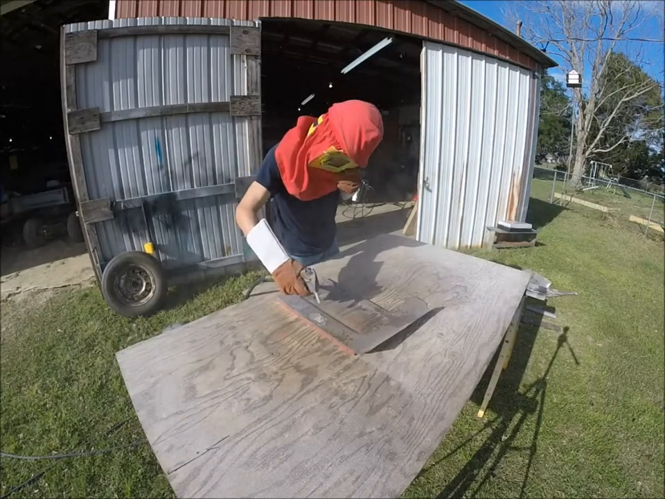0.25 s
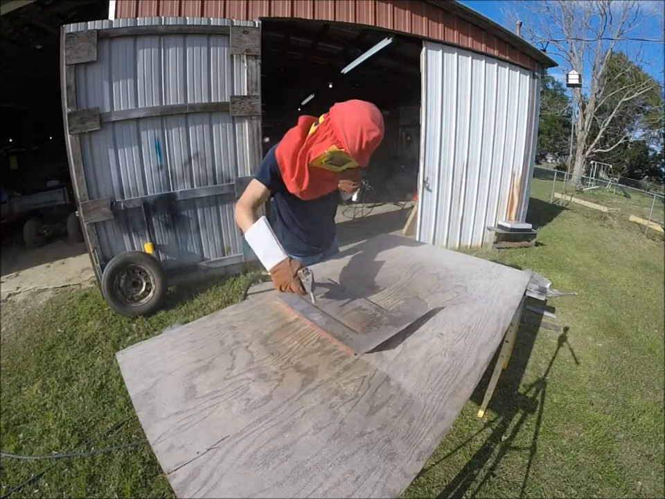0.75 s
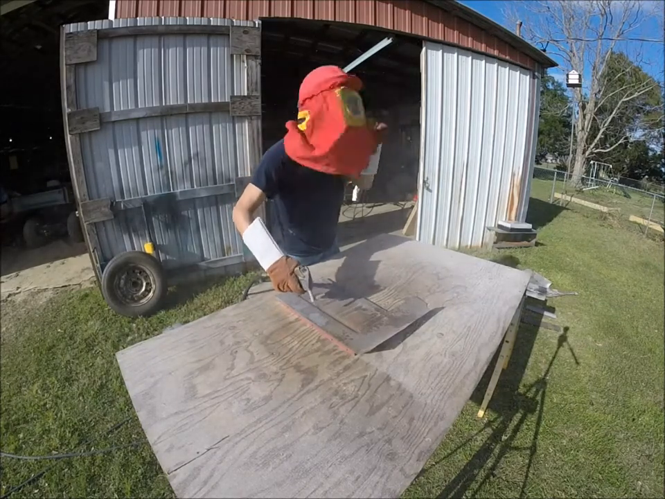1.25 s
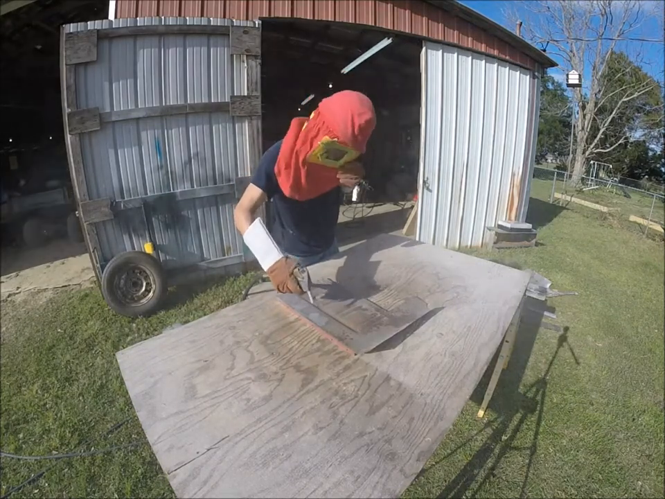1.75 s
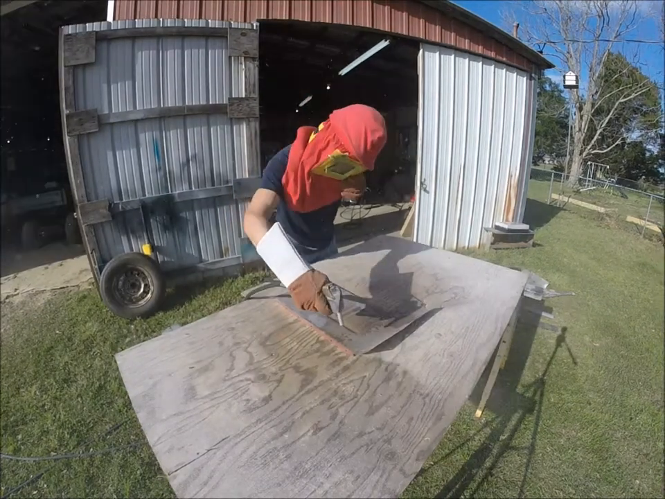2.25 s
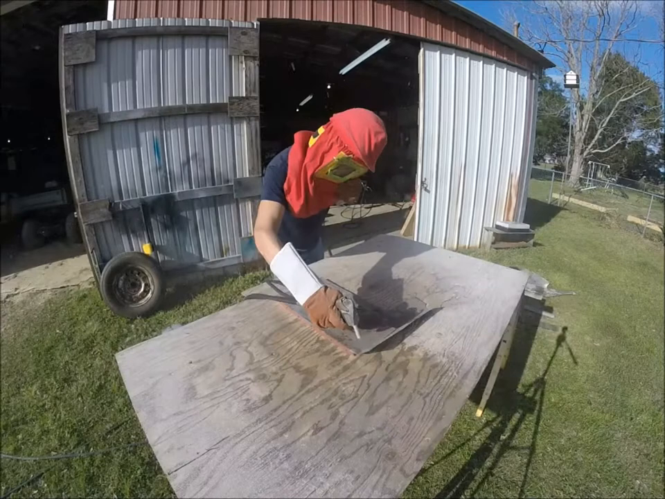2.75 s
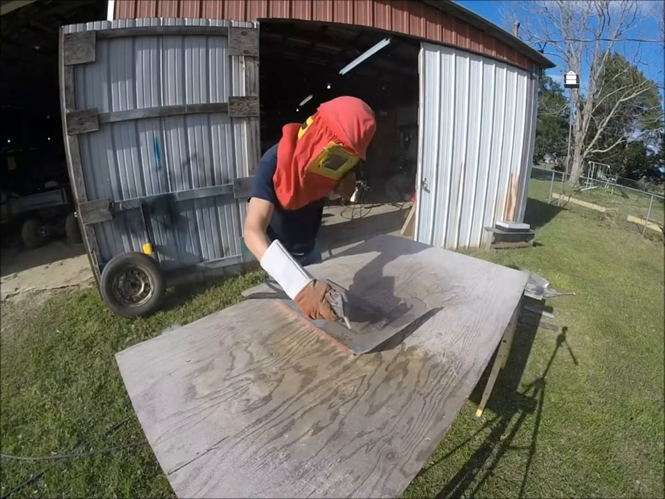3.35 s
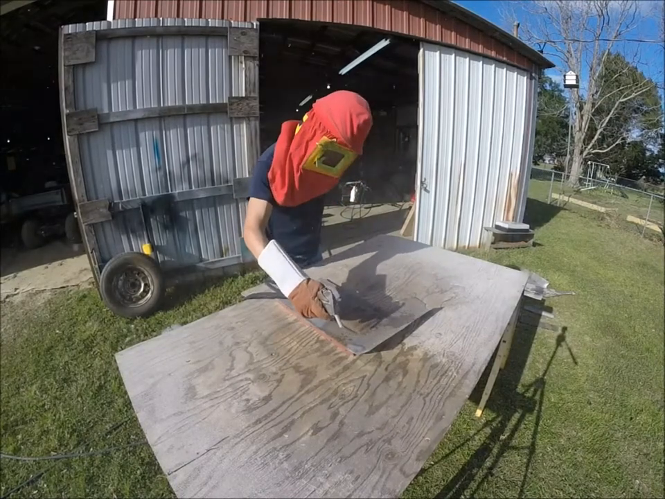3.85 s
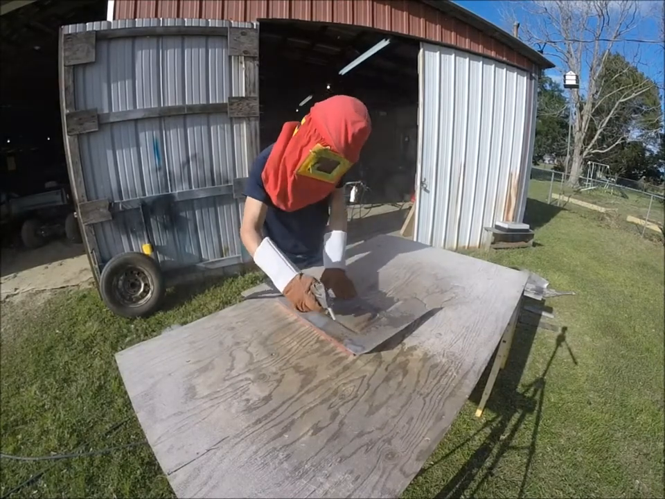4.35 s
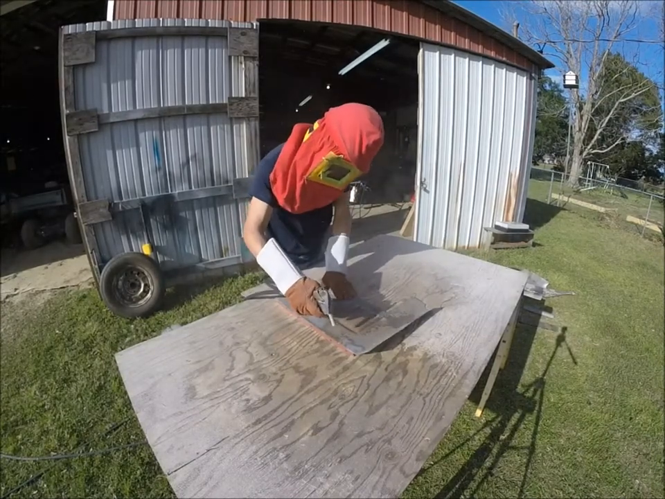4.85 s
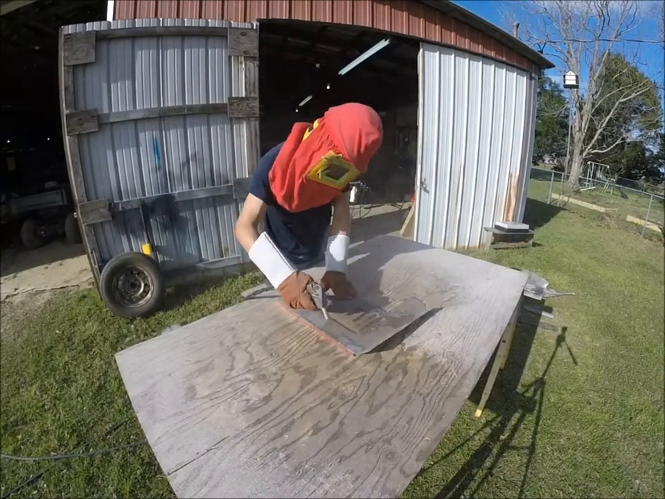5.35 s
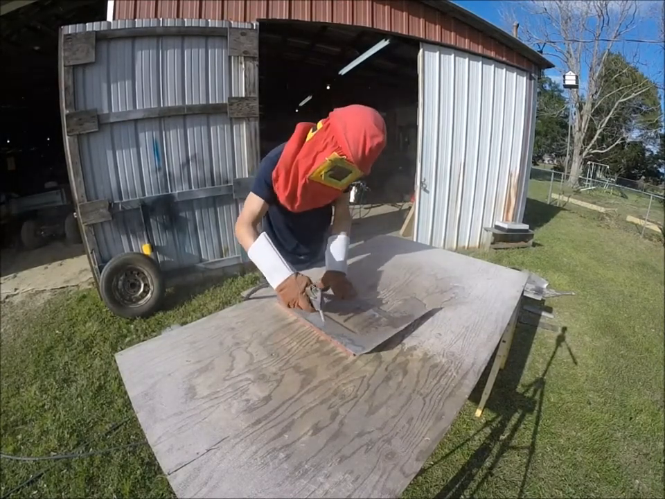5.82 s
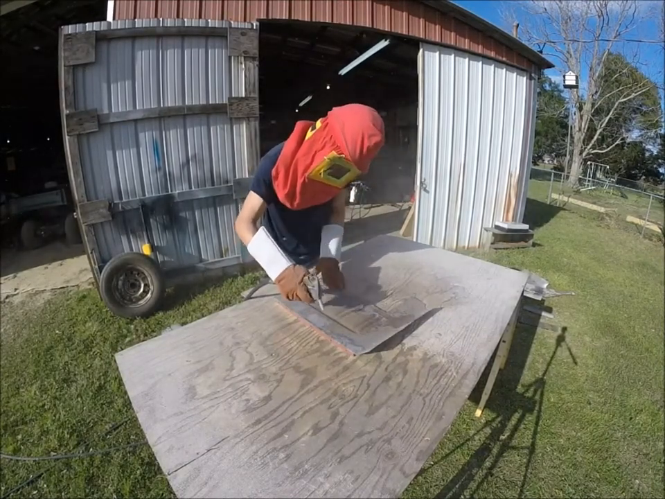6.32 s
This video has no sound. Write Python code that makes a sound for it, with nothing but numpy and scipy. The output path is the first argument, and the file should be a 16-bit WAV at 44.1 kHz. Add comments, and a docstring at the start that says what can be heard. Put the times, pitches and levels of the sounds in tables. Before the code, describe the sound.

A sandblasting gun hisses sharply and unevenly against rusty sheet steel, grit spattering in spurts while wind thumps and rasps on the microphone outdoors.

```python
"""A sandblasting gun on rusty sheet steel: filtered noise makes the jet's hiss and the rattle of grit.
Wind joins from the start as slow, quick and raspy noise with sharp puffs; a faint gliding tone comes at 1.6 s.
Grit surges near 2.1 s, and from 2.4 to 3.4 s the sheet rings strongly as noise through its resonances.
Grit spurts crowd together from 4.5 to 5.2 s; two more faint sine tones follow at 5.9 and 6.4 s.
Brief drop-outs dip the sound throughout; both channels are alike."""
import sys
import numpy as np
from scipy import signal
from scipy.fft import rfft, irfft, next_fast_len
from scipy.io import wavfile
from scipy.ndimage import uniform_filter1d, map_coordinates

SR = 44100
rng = np.random.default_rng(int(sys.argv[2]) if len(sys.argv) > 2 else 0)


def dump(signal):
    """Clip the signal to [-1, 1] and save it as 16-bit WAV at the path in sys.argv[1]."""
    limited = np.clip(np.atleast_2d(signal).T, -1, 1)
    pcm = np.round(limited * 32767).astype(np.int16)
    wavfile.write(sys.argv[1], SR, pcm)


N = 290178  # samples

# the gun as it sweeps, before spurts: start_s, jet_level_db, grit_level_db
GUN_SWEEP = [(0, -30, -36.5), (.09, -21.5, -34.5), (.28, -22, -35.5), (.39, -30, -36), (.55, -22, -38),
             (.78, -29.5, -41.5), (1.05, -23.5, -36.5), (1.3, -21.5, -37.5), (1.45, -25, -36.5),
             (1.62, -20.5, -33), (1.78, -25.5, -38.5), (1.98, -26.5, -41), (2.12, -19, -24),
             (2.3, -27.5, -27), (2.53, -22.5, -32), (2.65, -17.5, -34.5), (2.78, -22, -44),
             (2.96, -23, -37), (3.04, -21.5, -35), (3.25, -25, -32), (3.35, -24, -33), (3.72, -20.5, -29.5),
             (4.05, -21.5, -26.5), (4.2, -21, -37.5), (4.45, -20.5, -35.5), (4.62, -22, -39),
             (5.13, -23.5, -46), (5.2, -20.5, -36), (5.32, -22, -33), (5.6, -19, -30.5),
             (5.86, -23.5, -33.5), (6.03, -31, -42), (6.3, -31.5, -34), (6.4, -20, -42), (6.47, -31.5, -37),
             (6.58, -30, -39)]
# spurts of extra grit from the siphon: centre_s, lift_db, half_length_s
GRIT_SPURTS = [(0.214, 7, 0.027), (0.572, 7, 0.053), (0.933, 9, 0.045), (1.3, 2.5, 0.034), (1.57, 3.5, .04),
               (1.874, 19, 0.032), (2.16, 3, 0.046), (2.257, 4.5, 0.04), (2.37, 5.5, 0.05),
               (2.489, 9.5, 0.047), (2.59, 5.5, 0.029), (2.864, 15, 0.07), (3.156, 7, 0.067),
               (3.295, 6, 0.021), (3.814, 7.5, 0.048), (4.03, 1.5, .04), (4.139, 11, 0.029),
               (4.545, 12, 0.052), (4.697, 10.5, 0.02), (4.794, 9.5, 0.02), (4.88, 9, 0.025),
               (4.963, 10.5, 0.025), (5.033, 11.5, 0.027), (5.105, 12, 0.023), (5.173, 13, 0.02),
               (5.243, 9, 0.025), (5.382, 6, 0.033), (5.78, 0.5, .04), (6.11, 4, .035)]
# how strongly the spot under the jet rings the sheet, over the jet level: time_s, low_modes_db, high_modes_db
RINGING_SPOT = [(0, -29, -30), (.9, -10.5, -34), (2, -37, -18), (2.36, -15, -21), (2.48, -4, -21),
                (2.55, -19, -13), (2.63, -12, -2.5), (2.96, -8.5, -0.5), (3.27, -4, -3), (3.34, -9, -9),
                (3.75, -23, -24), (4.4, -27, -18), (5.3, -20, -26), (6.58, -24, -19)]
# spectrum of the air jet, relative: frequency_hz, density_db
JET_SPECTRUM = [(410, -53), (700, -18.5), (1090, -16), (1380, -11.5), (2540, -11.5), (2750, -12.5),
                (3470, -12.5), (4990, -12.5), (7380, -6.5), (13800, -0.5), (15700, 1.5)]
# nozzle resonances, over the jet spectrum: frequency_hz, width_hz, gain_db
NOZZLE_MODES = [(2744, 71, 8), (3760, 250, -4), (7800, 890, -6)]
# spectrum of grit on rust, relative: frequency_hz, density_db
GRIT_SPECTRUM = [(530, -50), (900, -34), (1510, -16), (2650, -4.5), (2910, -5), (3840, -2), (4650, -1.5),
                 (5060, 0), (7080, -5), (14900, -5.5), (15800, -15)]
# sheet resonances, relative within the low and high groups: frequency_hz, width_hz, gain_db
SHEET_MODES = [(3140, 460, -11.5), (4820, 590, -0.5), (5960, 1460, -3.5), (7800, 510, -3), (8900, 860, 2.5),
               (10100, 920, 3.5), (10300, 600, -4), (11250, 900, 5), (13400, 1700, 5.5), (16000, 1700, -5)]
# strength of the wind: time_s, rumble_level_db, flutter_level_db
WIND_LEVELS = [(.03, -38.5, -32.5), (.3, -53, -58), (.56, -43, -39.5), (.66, -50, -25.5), (.77, -48, -26.5),
               (.88, -51, -44), (1.15, -37, -50), (1.44, -46, -32.5), (1.6, -54, -55), (1.89, -45, -44.5),
               (2.15, -60, -52), (2.7, -51, -49), (2.88, -41, -41.5), (3.3, -52, -58), (3.5, -51, -49),
               (3.68, -41, -38), (3.92, -48, -50), (4.25, -48, -47), (4.43, -37.5, -39), (4.73, -43.5, -45),
               (4.87, -38.5, -45), (5.1, -44, -43), (5.2, -53, -51), (5.3, -42, -47.5), (5.59, -38, -45),
               (5.88, -46.5, -47.5), (6.01, -50, -54), (6.2, -46, -46), (6.58, -54, -51.5)]
# the strong wind puffs on the microphone: crest_s, rumble_level_db, body_level_db, rasp_level_db, length_s
STRONG_PUFFS = [(0.073, -43, -30.5, -47, 0.0057), (0.096, -41, -39, -31.5, 0.0077),
                (0.139, -37, -34.5, -37, 0.013), (0.313, -36, -38.5, -63, 0.015),
                (0.555, -34, -29, -34, 0.019), (0.615, -35, -21, -31, 0.015),
                (0.659, -49, -21.5, -33, 0.0068), (0.704, -43, -29, -19, 0.016),
                (0.741, -45, -20, -26, 0.022), (0.802, -47, -29, -50, 0.018),
                (0.897, -31, -40, -43, 0.0057), (0.943, -40, -32.5, -46, 0.0062),
                (1.156, -51, -33, -42, 0.048), (1.188, -49, -31.5, -42, 0.0078),
                (1.326, -35, -22, -35, 0.0095), (1.373, -45, -24.5, -37, 0.017),
                (1.406, -38, -26.5, -28, 0.015), (1.533, -32.5, -40, -28.5, 0.011),
                (1.605, -27.5, -27, -26.5, 0.021), (1.797, -38, -38, -41, 0.019),
                (1.864, -38, -38, -51, 0.054), (2.32, -38, -40.5, -39, 0.031),
                (2.859, -41, -24.5, -25, 0.011), (3.079, -35, -28, -28, 0.013),
                (3.126, -38, -30.5, -30.5, 0.025), (3.171, -48, -35.5, -39, 0.013),
                (3.288, -33, -32, -24, 0.0095), (3.317, -40, -36, -30, 0.012),
                (3.519, -40, -30, -43, 0.0082), (3.606, -38, -33, -37, 0.02),
                (3.654, -25.5, -49, -32, 0.011), (3.688, -25, -35, -31.5, 0.0068),
                (3.762, -36, -36, -57, 0.0088), (3.802, -28.5, -26, -22, 0.015),
                (3.843, -32, -29, -33, 0.013), (4.358, -31, -37, -47, 0.0068),
                (4.404, -31.5, -38, -37, 0.0082), (4.578, -36, -38.5, -48, 0.03),
                (4.802, -39, -39, -46, 0.02), (5.253, -43, -30, -42, 0.018), (5.617, -48, -33, -44, 0.01),
                (5.657, -36, -33, -55, 0.015), (5.94, -33, -52, -38.5, 0.01)]
# spectra of wind noise, relative, each: frequency_hz, density_db
RUMBLE_SPECTRUM = [(12, -45), (20, -16), (82, 1.5), (161, 3.5), (271, -9), (300, -12.5), (390, -67),
                   (660, -120)]
FLUTTER_SPECTRUM = [(80, -19), (150, -1.5), (240, 0.5), (400, -2), (600, -11), (1200, -47)]
RASP_SPECTRUM = [(250, -25), (450, -2.5), (650, -1), (900, -3), (1400, -14), (2500, -25)]
# spectrum of the body of a puff, relative: frequency_hz, density_db
PUFF_SPECTRUM = [(100, -34), (200, -1.5), (330, 5), (480, 0), (700, -12.5), (1200, -67)]
# faint soft tones: start_s, length_s, first_pitch_hz, last_pitch_hz, level_db
SOFT_TONES = [(1.627, 0.22, 555, 598, -47), (5.946, 0.19, 787, 770, -56.5), (6.438, .2, 757, 747, -53.5)]
# instants when the sound drops out: centre_s, full_depth_db, hold_s, spared_below_hz
DROP_OUTS = [(.026, 20, 0, 300), (.696, 40, .026, 1000), (.793, 22, 0, 500), (1.093, 18, 0, 100),
             (1.22, 21, 0, 100), (1.817, 19, 0, 800), (1.882, 13, 0, 500), (2.18, 21, 0, 40),
             (2.522, 21, 0, 150), (2.714, 16, 0, 40), (2.82, 16, 0, 400), (2.906, 18, 0, 150),
             (3.012, 20, 0, 60), (3.481, 22, 0, 40), (3.567, 18, 0, 200), (3.61, 18, 0, 750),
             (4.166, 17, 0, 150), (4.675, 22, 0, 200), (4.846, 22, 0, 250), (5.294, 19, 0, 350),
             (5.593, 19, 0, 350), (6.255, 21, 0, 100), (6.425, 18, 0, 200)]
# share of the full depth lost at each pitch: frequency_hz, share (0-1)
DEPTH_SHARE = [(5000, 1), (10000, .55), (15000, .25)]

SPURT_LIFTS_JET = 0.27  # dB of air jet for each dB of grit
EVEN_JET_DB, BODY_THINS = -22, 0.7  # body is even at this jet level; dB lost per dB of jet above it
RASP_CALM_DB, RASP_FULL_DB, RASP_GROWS = -52, -25.5, 2.2  # floor; flutter level it equals; dB per dB of flutter
SMALL_PUFFS = 45  # weak puffs at random moments
SMALL_OVER_DB = (2.5, 0.5, -5)  # rumble over the wind's rumble; body and rasp over its flutter
SMALL_SPREAD_DB, SMALL_LENGTH_S = 2.5, 0.014  # scatter of level; median length
TONE_FADE_S, DROP_FADE_S = 0.03, 0.023
TOP_HZ = 15750  # band limit


def amp(db):
    """A level in decibels is twenty times the logarithm of an amplitude ratio."""
    return 10 ** (np.asarray(db) / 20)


def unit(x):
    """Division by the root-mean-square gives a signal unit effective value."""
    return x / np.sqrt(np.mean(x ** 2) + 1e-20)


def along(points, hz):
    """A spectrum is interpolated between points on a logarithmic frequency axis."""
    f, v = np.transpose(points)
    return np.interp(np.log(hz + 1), np.log(f + 1), v)


def curves(rows):
    """Linear interpolation gives one value per sample for each column after the time."""
    s, *columns = np.transpose(rows)
    return [np.interp(np.arange(N) / SR, s, column) for column in columns]


def wobble(rate):
    """A spline through random knots, rate of them a second, is a smooth random fluctuation."""
    knots = rng.standard_normal(int(N * 200 / SR))
    return map_coordinates(knots, [np.arange(N) * rate / SR])


def filtered(x, response):
    """A linear filter multiplies the spectrum by its frequency response."""
    m = next_fast_len(x.shape[-1] + 8192)
    spectrum = rfft(x, m) * response(np.fft.rfftfreq(m, 1 / SR))
    return irfft(spectrum, m)[..., :x.shape[-1]]


def shaped(x, points):
    """Spectral shaping: the response follows a table of frequency and dB."""
    return filtered(x, lambda hz: amp(along(points, hz)))


def modes(table, hz):
    """Independent resonances add in power; the result is their joint amplitude response."""
    power = sum(amp(db) ** 2 / (1 + (2 * (hz - centre) / width) ** 2) ** 2 for centre, width, db in table)
    return np.sqrt(power)


def patchy(patchy_db):
    """Turbulence is uneven: noise with random gain in patches some 700 Hz wide and 60 ms long."""
    z = signal.stft(rng.standard_normal(N + 512), nperseg=512)[2]
    across_pitch = uniform_filter1d(rng.standard_normal(z.shape), size=8, axis=0)
    field = uniform_filter1d(across_pitch, size=10, axis=1)
    return signal.istft(z * amp(patchy_db * unit(field)), nperseg=512)[1][:N]


def gun():
    """Turbulence and impact: air hisses from the nozzle, grains hail on rust and excite the sheet's modes."""
    lift_db = spurts()
    jet_db, grit_db = curves(GUN_SWEEP)
    jet_db = jet_db + SPURT_LIFTS_JET * lift_db
    grit_db = grit_db + lift_db
    surge = wobble(9.7)  # the siphon feeds grit unevenly
    return (amp(jet_db + 0.2 * surge) * air_jet(jet_db) + amp(grit_db + 0.2 * surge) * grit_hail()
            + amp(0.83 * surge) * sheet_ringing(jet_db))


def spurts():
    """Superposition of pulses: each spurt swells and fades as a Gaussian bell in dB."""
    t = np.arange(N) / SR
    return sum(lift_db * np.exp(-((t - s) / half) ** 2) for s, lift_db, half in GRIT_SPURTS)


def air_jet(jet_db):
    """Jet noise: broadband turbulence coloured by nozzle resonances, its body thinner when louder."""
    jet = unit(filtered(patchy(patchy_db=1.0), lambda hz: (
        amp(along(JET_SPECTRUM, hz)) * np.hypot(1, modes(NOZZLE_MODES, hz)))))
    body = filtered(jet, lambda hz: 1 / (1 + (hz / 10500) ** 6))
    body_db = BODY_THINS * (EVEN_JET_DB - jet_db) + 0.83 * wobble(12)
    return jet + (amp(body_db) - 1) * body


def grit_hail():
    """Shot noise: grains of uneven size scatter the strength of a dense hail."""
    hail = patchy(patchy_db=2.5) * amp(2.0 * rng.exponential(size=N))
    return unit(shaped(hail, GRIT_SPECTRUM))


def sheet_ringing(jet_db):
    """Modal excitation: where the jet lands decides which of the sheet's modes answer."""
    shake = patchy(patchy_db=1.5)
    low = unit(filtered(shake, lambda hz: modes(SHEET_MODES[:3], hz)))
    high = unit(filtered(shake, lambda hz: modes(SHEET_MODES[3:], hz)))
    low_over_db, high_over_db = curves(RINGING_SPOT)
    return amp(jet_db + low_over_db) * low + amp(jet_db + high_over_db) * high


def wind():
    """Eddies tumble over the microphone port: a lumpy rumble, a quicker flutter and a rasp on top."""
    rumble_db, flutter_db = curves(WIND_LEVELS)
    growing_db = RASP_FULL_DB + RASP_GROWS * (flutter_db - RASP_FULL_DB)
    rasp_gain = np.hypot(amp(RASP_CALM_DB), amp(growing_db))
    lumps, eddies = wobble(14), wobble(40)
    rumble = shaped(rng.standard_normal(N), RUMBLE_SPECTRUM)
    flutter = shaped(rng.standard_normal(N), FLUTTER_SPECTRUM)
    rasp = shaped(rng.standard_normal(N), RASP_SPECTRUM)
    return (amp(rumble_db) * unit(amp(3.5 * lumps) * rumble)
            + amp(flutter_db) * unit(amp(1.5 * lumps + 3.2 * eddies) * flutter)
            + rasp_gain * unit(amp(1.6 * lumps + 1.1 * eddies) * rasp))


def puffs():
    """Gust pressure swells to a snap and dies; the rasp clusters at the crest, where the air is fastest."""
    half = SR // 10
    t = np.arange(-half, half) / SR
    out = np.zeros(N + len(t))
    spectra = (RUMBLE_SPECTRUM, PUFF_SPECTRUM, RASP_SPECTRUM)
    for s, *levels_db, length in [*STRONG_PUFFS, *small_puffs()]:
        eddies = rng.standard_normal(len(t)) * amp(2.5 * rng.exponential(size=len(t)))  # a few stand out
        eddies[len(t) // 2] -= 9 * np.std(eddies)  # the snap: one sudden suction at the crest
        for points, db, stretch in zip(spectra, levels_db, (1.3, 0.9, 0.6)):
            swell = np.exp(-np.abs(t / (stretch * length)) ** 1.25)
            puff = swell * shaped(eddies, points)
            level = amp(db) * np.sqrt(np.sum(swell ** 2) / np.sum(puff ** 2))  # same energy as the swell
            out[round(s * SR):][:len(t)] += level * puff
    return out[half:][:N]


def small_puffs():
    """Random gusts: rows like those of STRONG_PUFFS, their levels following the wind of the moment."""
    s, rumble_db, flutter_db = np.transpose(WIND_LEVELS)
    when = np.sort(rng.uniform(0, N / SR, SMALL_PUFFS))
    draws = rng.standard_normal((SMALL_PUFFS, 4))
    wind_db = np.array([np.interp(when, s, column) for column in (rumble_db, flutter_db, flutter_db)]).T
    levels_db = wind_db + SMALL_OVER_DB + SMALL_SPREAD_DB * draws[:, :3]
    lengths_s = SMALL_LENGTH_S * np.exp(0.44 * draws[:, 3])
    return list(np.column_stack([when, levels_db, lengths_s]))


def hoots():
    """Frequency is the rate of phase: plain sines whose pitch glides a little."""
    out, t = np.zeros(N), np.arange(N) / SR
    for s, length, first_hz, last_hz, db in SOFT_TONES:
        progress = np.clip((t - s) / length, 0, 1)
        pitch_hz = first_hz + (last_hz - first_hz) * progress
        fade = np.clip(np.minimum(t - s, s + length - t) / TONE_FADE_S, 0, 1)
        out += np.sqrt(2) * amp(db) * fade * np.sin(2 * np.pi * np.cumsum(pitch_hz) / SR)
    return out


def scene():
    """Superposition: the sources add, alike in both channels."""
    sound = gun() + wind() + puffs() + hoots()
    return np.array([sound, sound])


def record(dry):
    """Time-varying filtering: drop-outs dip the sound briefly, and a band limit removes the top."""
    hz, t, z = signal.stft(dry, SR, nperseg=256, noverlap=192)
    share = np.clip(along(DEPTH_SHARE, hz), 0, 1)
    for s, depth_db, hold, spared_hz in DROP_OUTS:
        away = np.clip((np.abs(t - s) - hold / 2) / DROP_FADE_S, 0, 1)  # 0 inside the hold, 1 outside the fades
        above_spared = hz ** 8 / (hz ** 8 + spared_hz ** 8)
        least = amp(-depth_db * share * above_spared)
        z = z * np.sqrt(1 - np.outer(1 - least ** 2, np.cos(np.pi / 2 * away) ** 2))
    dipped = signal.istft(z, SR, nperseg=256, noverlap=192)[1][:, :N]
    return filtered(dipped, lambda hz: hz < TOP_HZ)


dry = scene()
out = record(dry)
dump(out)
```